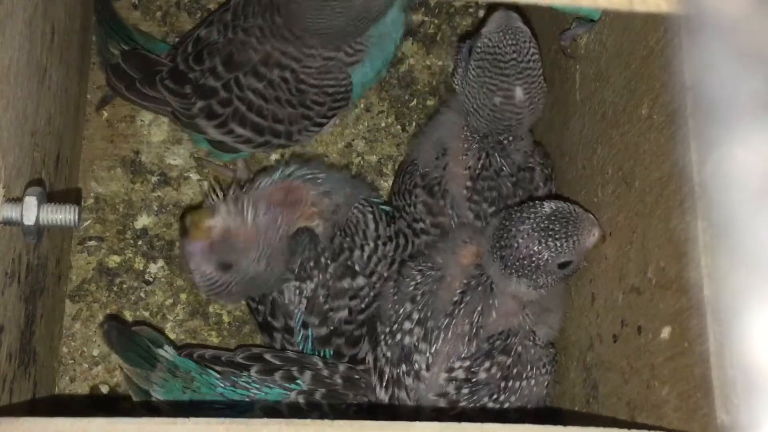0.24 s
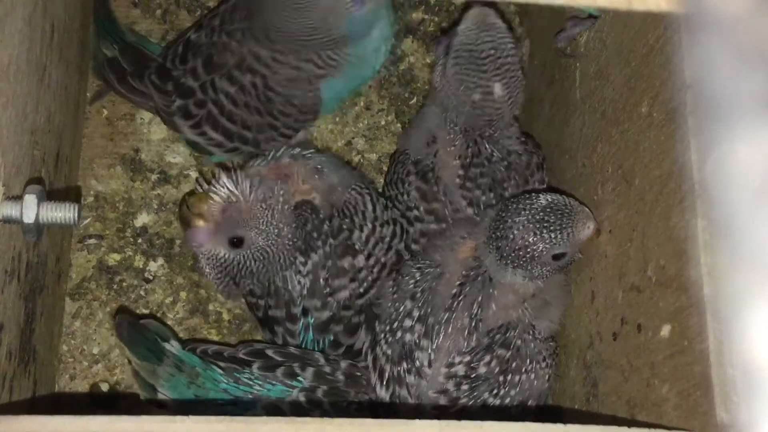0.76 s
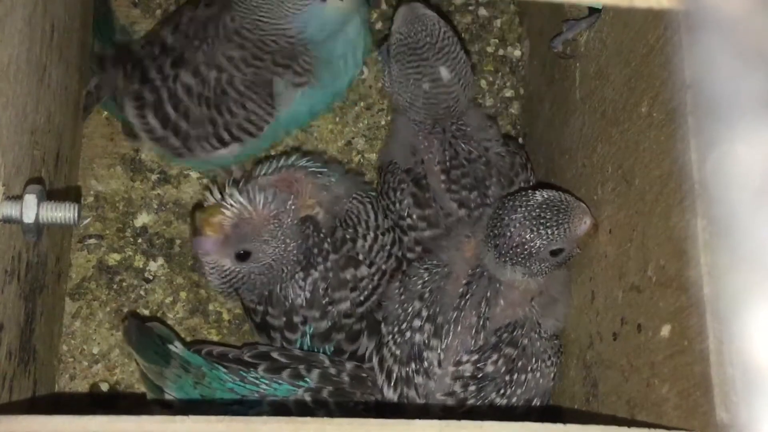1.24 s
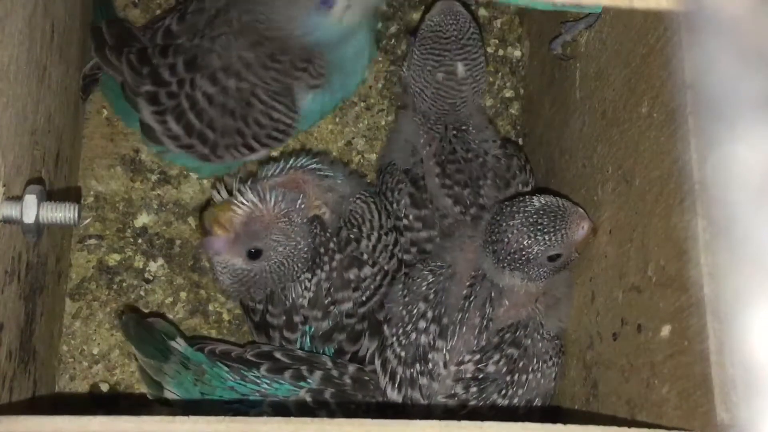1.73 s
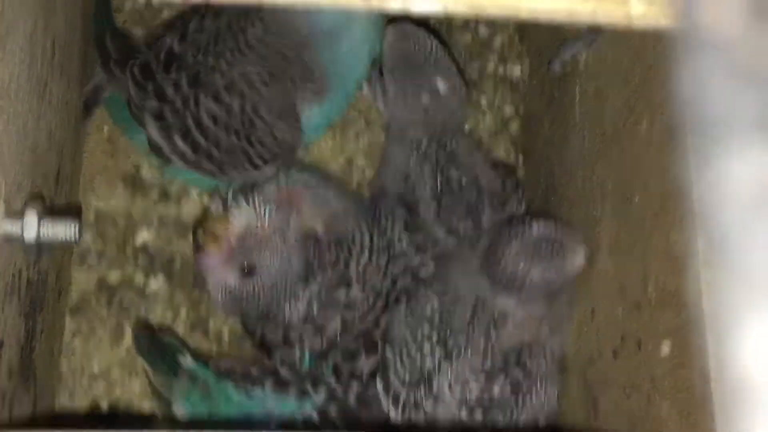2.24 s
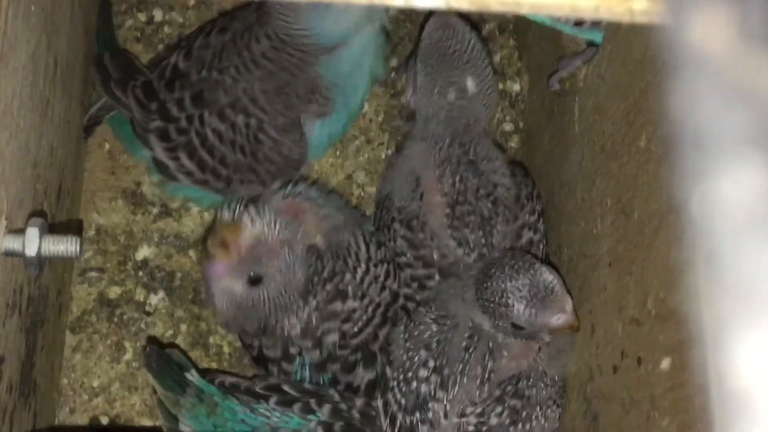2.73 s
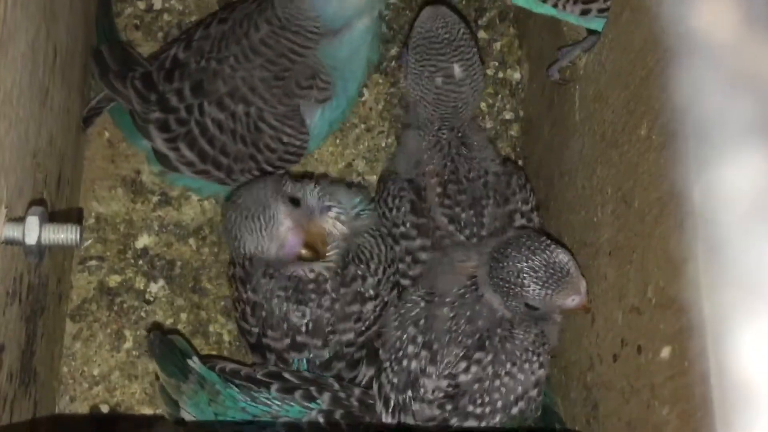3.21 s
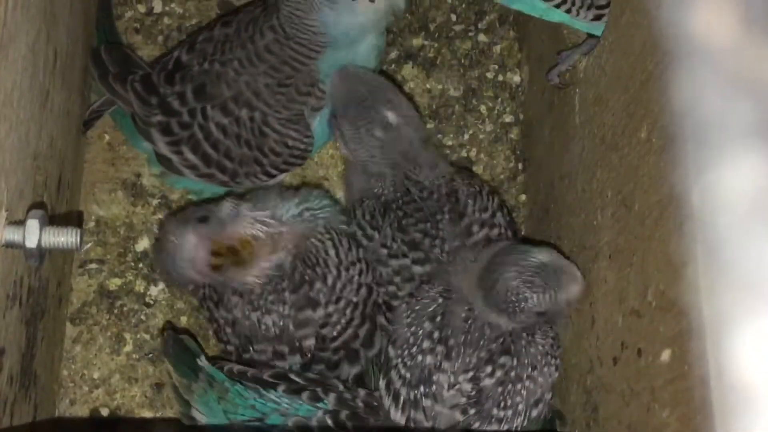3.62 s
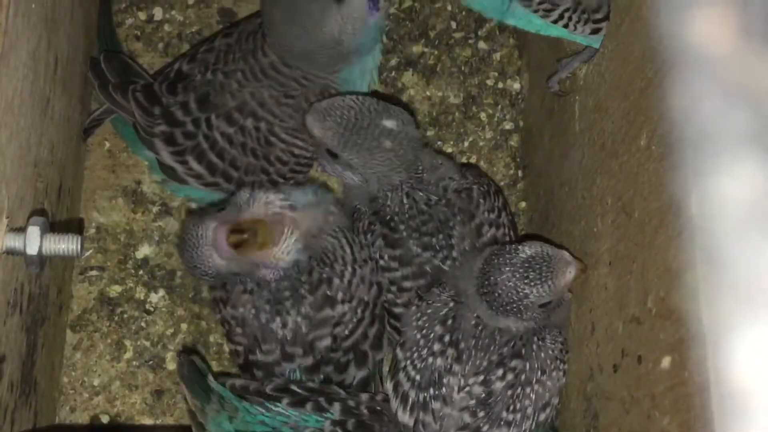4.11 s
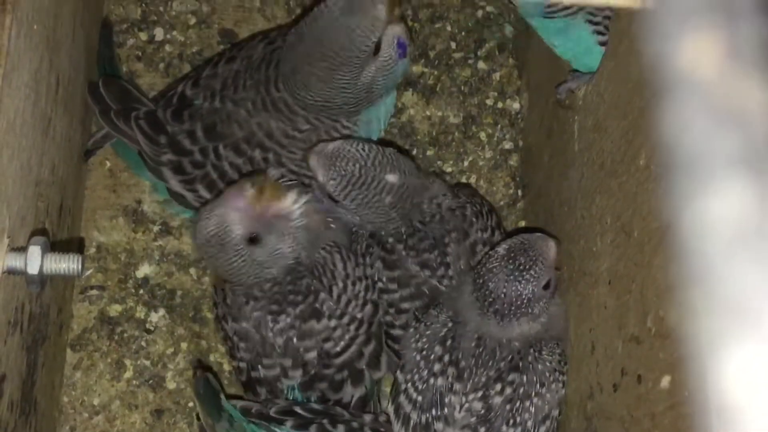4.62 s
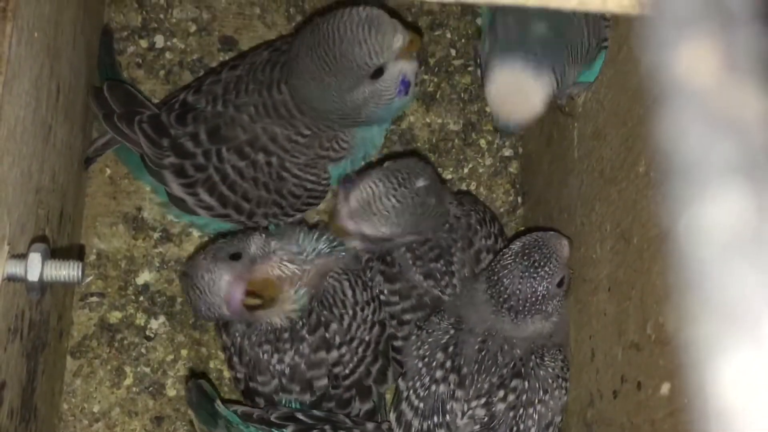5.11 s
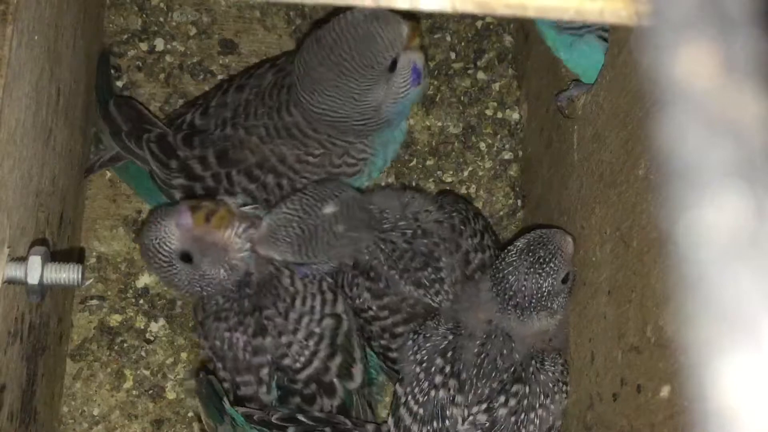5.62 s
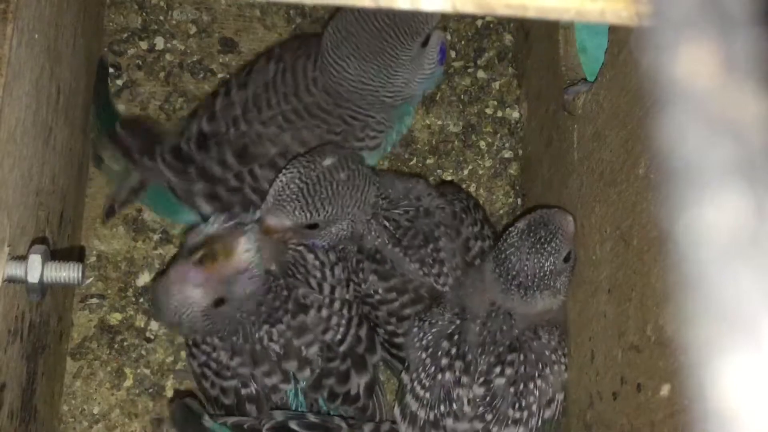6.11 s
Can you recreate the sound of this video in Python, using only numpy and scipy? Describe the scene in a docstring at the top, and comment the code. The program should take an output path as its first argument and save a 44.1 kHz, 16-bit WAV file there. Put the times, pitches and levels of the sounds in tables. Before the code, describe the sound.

A whistle tail and falling notes open into a run of shrill, rasping chick calls, fluttering very fast. Later calls burst in more sharply at the top and slide down, with brief pauses and quiet ticks on wood, one knock clearer midway. A second chick whistles higher over them. Close microphone, small hard-walled nest box, little room tail, faint electrical hum and soft shuffling.

```python
"""A soft whistle tail and falling notes over faint hum, then rasping calls of budgerigar chicks begging.
Each call starts high and sags, fluttering fast, and breaks into loud low scoops with soft upward flips.
Falling notes and soft whistles link the calls; a smoother second voice joins in. Feet shuffle, claws tap wood.
Voices are sine overtones on a fluttering pitch plus hiss, coloured by throat and beak; taps are ringing modes
plus noise ticks, shuffles are filtered noise. Box walls and room echo voices and taps."""
import sys
import numpy as np
from scipy import signal
from scipy.fft import rfft, irfft, next_fast_len
from scipy.io import wavfile
from scipy.ndimage import uniform_filter1d, minimum_filter1d

SR = 44100
rng = np.random.default_rng(int(sys.argv[2]) if len(sys.argv) > 2 else 0)


def wav_record(signal):
    """Record a signal, one row per channel, as 16-bit PCM in the file named by sys.argv[1]."""
    frames = np.transpose(np.atleast_2d(signal))
    bounded = np.clip(frames, -1, 1)
    # unit amplitude maps onto the largest positive 16-bit level
    quanta = np.round(bounded * 32767).astype(np.int16)
    wavfile.write(sys.argv[1], SR, quanta)


N = 280035
TIME = np.arange(N) / SR


def undb(db):
    """Decibels to gain."""
    return np.exp(np.asarray(db) * (np.log(10) / 20))


def unit(x):
    """Scale to rms 1."""
    return x / np.sqrt(np.mean(x ** 2))


def colour(x, points):
    """Filter by a spectrum of (f/Hz, level/dB) points, interpolated over log frequency."""
    hz, db = np.transpose(points)
    size = next_fast_len(len(x) + 4096)
    bins_hz = np.arange(size // 2 + 1) * SR / size
    gain = undb(np.interp(np.log(bins_hz + 1), np.log(hz), db))
    return irfft(rfft(x, size) * gain, size)[:len(x)]


def wander(hz):
    """Random motion of rms 1: noise low-passed at hz."""
    lowpass = signal.butter(4, hz, fs=SR, output="sos")
    return unit(signal.sosfilt(lowpass, rng.standard_normal(N)))


def flutter(period_s, scatter, count=1500, order=4):
    """Downward flicks of random length and depth, briefer at a higher order; mean 0, rms 1."""
    length, depth = rng.standard_normal((count, 2)).T
    edges_s = np.cumsum(period_s * np.exp(.25 * length + .2 * depth))
    cycle = np.interp(TIME + edges_s[0], edges_s, np.arange(count))
    flick_depth = np.exp(scatter * np.clip(depth, -2, 1.5))[cycle.astype(int)]
    flicks = -flick_depth * np.abs(np.sin(np.pi * cycle)) ** order
    return unit(flicks - flicks.mean())


def open_share(start, end, fade_s):
    """Linear ramps, 0 to 1 and back, centred on start and end."""
    return np.clip(np.minimum(TIME - start, end - TIME) / fade_s + .5, 0, 1)


def window(start, end, fade_s):
    """Smooth gate, open from start to end."""
    return np.sin(open_share(start, end, fade_s) * np.pi / 2) ** 2


def sounding(table, fade_s):
    """Gate open during each event of a table, and across events that touch."""
    ramps = sum(open_share(row[0], row[1], fade_s) for row in table)
    return np.sin(np.minimum(ramps, 1) * np.pi / 2) ** 2


def held(table, lead_s):
    """Columns of the latest event at every moment, taken up lead_s before it starts."""
    rows = np.array(table, float)
    latest = np.searchsorted(rows[:, 0] - lead_s, TIME) - 1
    return rows.T[:, np.maximum(latest, 0)]


def sag(age_s, half_s):
    """Tension of a call: 1 at its start, half after half_s, then easing to 0."""
    return 1 / (1 + (age_s / half_s) ** 2)


def blend(voice, other, share):
    """Move each control of a voice towards another setting."""
    return [a + share * (b - a) for a, b in zip(voice, other)]


# hum partials: f/Hz, rms level/dB
HUM_PARTIALS = [(120, -67), (180, -66.5), (240, -65.5), (300, -81.5), (420, -78), (483, -78), (760, -73)]
# spectrum of the room noise, scaled as a whole below: f/Hz, relative density/dB
AIR_SPECTRUM = [(30, 9), (80, -10), (130, -4), (260, 6), (450, -2), (700, -1), (950, -3), (1300, -3),
                (1800, 2.5), (2600, -8), (5000, -29), (9000, -18), (15000, -24.5)]


def background(air_db):
    """Steady sine hum over faint coloured room noise."""
    hum = 0
    for hz, db in HUM_PARTIALS:
        hum = hum + np.sqrt(2) * undb(db) * np.sin(2 * np.pi * (hz * TIME + rng.random()))
    return hum + undb(air_db) * unit(colour(rng.standard_normal(N), AIR_SPECTRUM))


WHISTLE_SWELL_DB_PER_S, WHISTLE_UPPER_DB = 32.5, -3.5  # upper overtones relative to the octave
WHISTLE_FLUTTER_HZ, SPUTTER_DB = 70, 4.5
# soft whistles: start t/s, end t/s, f/Hz, fundamental level/dB, octave level/dB (levels at mid-note)
WHISTLE_NOTES = [(-0.01, 0.02, 3280, -33.5, -30), (4.108, 4.22, 3430, -26.5, -46),
                 (4.85, 5.035, 3490, -24, -34), (5.792, 5.848, 3467, -25, -36.5)]


def whistles(fade_s):
    """Notes of level pitch that sputter and swell towards the next call."""
    start, end, hz, low_db, octave_db = held(WHISTLE_NOTES, fade_s)
    swell_db = WHISTLE_SWELL_DB_PER_S * (np.clip(TIME, start, end) - (start + end) / 2)
    swell_db = swell_db + SPUTTER_DB * flutter(period_s=.014, scatter=.4)
    octave_db = octave_db + swell_db
    upper_db = octave_db + WHISTLE_UPPER_DB
    voice = [hz, low_db + swell_db, octave_db, upper_db, np.full(N, WHISTLE_FLUTTER_HZ)]
    return sounding(WHISTLE_NOTES, fade_s), voice


FALL_FADE_DB, FALL_FADE_POWER = -8.5, 5.2  # most of the fade comes at the very end
# falling notes: start t/s, end t/s, top f/Hz, last f/Hz, lateness of the fall (power), fundamental level/dB,
# octave level/dB, upper overtones level/dB, flutter depth/Hz (before bursts)
FALLING_NOTES = [(0.02, 0.097, 3780, 2970, 1.72, -18.5, -15, -22, 115.1),
                 (0.097, 0.178, 3490, 3100, 2.34, -19, -14.5, -23.5, 40),
                 (0.178, 0.214, 2750, 2300, 1.2, -33.5, -24, -23.5, 141.4),
                 (0.885, 0.948, 3423, 3140, 1.5, -18, -18.5, -24, 89.64),
                 (2.095, 2.245, 3506, 3380, 4, -24, -14.5, -22, 60),
                 (2.245, 2.312, 3188, 2780, 3, -23.5, -12, -16.5, 107),
                 (2.312, 2.339, 2256, 1990, 0.997, -32, -22, -26, 258.6),
                 (3.012, 3.143, 3453, 3240, 3, -24.5, -16.5, -17.5, 97.5),
                 (3.143, 3.166, 2900, 2450, 1.1, -30.5, -24, -21.5, 181.3),
                 (3.93, 4.02, 3600, 2860, 2.5, -19.5, -19.5, -21, 173),
                 (4.002, 4.074, 2878, 2532, 0.66, -28.5, -12.5, -20, 113.8),
                 (4.755, 4.85, 2850, 2404, 3, -28, -15.5, -26.5, 138),
                 (5.68, 5.754, 3080, 2400, 4.6, -24.5, -15, -22.5, 151)]


def falls(fade_s):
    """Pitch drops along a power curve, mostly late in the note, and the level dies away."""
    start, end, top_hz, last_hz, power, low_db, octave_db, upper_db, flutter_hz = held(FALLING_NOTES, fade_s / 2)
    along = np.clip((TIME - start) / (end - start), 0, 1)
    fade_db = FALL_FADE_DB * along ** FALL_FADE_POWER
    hz = top_hz + (last_hz - top_hz) * along ** power
    voice = [hz, low_db + fade_db, octave_db + fade_db, upper_db + fade_db, flutter_hz]
    return sounding(FALLING_NOTES, fade_s), voice


SCOOP_RIM_HZ, SCOOP_SKEW = 377.7, 1.35  # edges above the bottom; skew over 1 puts the bottom late
SCOOP_LOW_DB, SCOOP_UPPER_DB = -23.5, -5.5  # fundamental; upper overtones relative to the octave
FLIP_S, FLIP_LOW_DB, FLIP_OCTAVE_DB, FLIP_UPPER_DB = 0.019, -23.5, -18.5, -21.5
YODEL_FLUTTER_HZ = 80.8  # before bursts
# yodel scoops: start t/s, end t/s, lowest f/Hz, octave level/dB, f/Hz of the flip that follows
YODEL_SCOOPS = [(0.08, 0.096, 2825, -14.5, 3520), (0.376, 0.396, 2950, -8.5, 3100),
                (0.438, 0.468, 2850, -13, 2900), (0.47, 0.52, 2532, -8.5, 3100),
                (0.543, 0.57, 2520, -9, 2850), (0.594, 0.651, 2435, -13, 3800),
                (0.673, 0.70, 2460, -7, 3400), (0.726, 0.782, 2406, -14, 3300),
                (0.809, 0.833, 2460, -18.5, 3300), (0.857, 0.882, 2550, -17.5, 3464),
                (0.948, 0.964, 2580, -14.5, 3498), (1.337, 1.395, 2695, -11, 3986),
                (1.419, 1.443, 2570, -11, 3600), (1.461, 1.527, 2535, -12, 3950),
                (1.549, 1.577, 2520, -18, 3850), (1.6, 1.662, 2515, -18.5, 4018),
                (2.132, 2.162, 2900, -13, 3430), (3.75, 3.793, 2890, -9.5, 3040),
                (3.795, 3.815, 2559, -11.5, 2830), (4.41, 4.458, 2597, -13, 3220),
                (4.525, 4.585, 2505, -9.5, 3300), (4.607, 4.634, 2560, -12.5, 3200),
                (4.66, 4.68, 2522, -15, 3231), (4.69, 4.714, 2510, -14, 3600),
                (4.735, 4.755, 2435, -14.5, 2698), (5.35, 5.371, 2520, -8.5, 3200),
                (5.393, 5.414, 2658, -9.5, 2984), (5.449, 5.469, 2396, -20, 2939),
                (5.476, 5.496, 2540, -8.5, 3310), (5.521, 5.543, 2500, -11.5, 3648),
                (5.577, 5.629, 2430, -10.5, 3566), (5.654, 5.678, 2500, -13.5, 3173),
                (6.085, 6.13, 2597, -15, 3080), (6.24, 6.305, 2430, -17.5, 3855)]


def yodel(voice, break_s):
    """The register breaks into a low scoop with a loud octave, then flips up into a soft high one."""
    start, end, bottom_hz, octave_db, flip_hz = held(YODEL_SCOOPS, break_s / 2)
    along = np.clip((TIME - start) / (end - start), 0, 1)
    scoop_hz = bottom_hz + SCOOP_RIM_HZ * (2 * along ** SCOOP_SKEW - 1) ** 2
    flip = [flip_hz, FLIP_LOW_DB, FLIP_OCTAVE_DB, FLIP_UPPER_DB, YODEL_FLUTTER_HZ]
    scoop = [scoop_hz, SCOOP_LOW_DB, octave_db, octave_db + SCOOP_UPPER_DB, YODEL_FLUTTER_HZ]
    voice = blend(voice, flip, window(end - break_s, end + FLIP_S, break_s))
    return blend(voice, scoop, window(start, end, break_s))


ATTACK_S, ATTACK_DB = 0.0062, -11  # a beg swells up from this much softer
FLUTTER_FADE_S = 1.7  # 1/e time
# begging calls: start t/s, end t/s, first f/Hz, settled f/Hz, half-sag t/s, first fundamental level/dB,
# settled fundamental level/dB, octave level/dB, upper overtones level/dB, first flutter depth/Hz (before bursts)
BEG_CALLS = [(0.228, 0.885, 3682, 2516, 0.16, -16, -27, -16, -20, 197.4),
             (0.941, 1.688, 3570, 2770, .18, -15.5, -25.5, -21.5, -21, 203.6),
             (1.688, 2.095, 3700, 2744, .14, -13, -24.5, -16, -20.5, 197.3),
             (2.647, 3.012, 3660, 2677, 0.089, -13, -24, -17.5, -18.5, 242.3),
             (3.533, 3.93, 3880, 2800, .05, -6, -26, -18.5, -16.5, 185.3),
             (4.218, 4.755, 3610, 2856, .08, -9.5, -20.5, -16, -15.5, 158.6),
             (5.033, 5.68, 3573, 2751, .085, -10, -24.5, -16, -14, 164.6),
             (5.842, 6.37, 3583, 2910, .07, -12.5, -20, -15, -15.5, 157.4)]


def begs(fade_s):
    """After a quick swell, pitch and fundamental sag together as the tension eases; the flutter calms."""
    (start, end, first_hz, settled_hz, half_s, first_db, settled_db,
     octave_db, upper_db, flutter_hz) = held(BEG_CALLS, fade_s / 2)
    age_s = np.maximum(TIME - start, 0)
    hz, low_db = blend([settled_hz, settled_db], [first_hz, first_db], sag(age_s, half_s))
    swell_db = ATTACK_DB * np.exp(-(age_s / ATTACK_S) ** 2)
    flutter_hz = flutter_hz * np.exp(-age_s / FLUTTER_FADE_S)
    voice = [hz, low_db + swell_db, octave_db + swell_db, upper_db + swell_db, flutter_hz]
    return sounding(BEG_CALLS, fade_s), voice


SIDE_TONE_HZ, SIDE_TONE_DEPTH, SIDE_TONE_DRIFT = 428, 0.26, 0.2  # means; drift as rms share of the rate


def side_tones():
    """A slower throat vibration comes and goes, putting rough side tones around every overtone."""
    hz = SIDE_TONE_HZ * (1 + SIDE_TONE_DRIFT * wander(30))
    depth = SIDE_TONE_DEPTH * (1 + np.tanh(wander(14.3)))
    return 1 + depth * np.sin(2 * np.pi * np.cumsum(hz) / SR)


def syrinx(hz, harmonic_db, rasp, shimmer_db, hiss_db):
    """A membrane vibrates with overtones in uneven cycles; air hisses past it in bursts."""
    phase = 2 * np.pi * np.cumsum(hz * (1 + rasp * wander(650))) / SR
    throb = wander(220)
    tone = 0
    for k, db in enumerate(harmonic_db, 1):
        in_range = np.clip((SR / 2 - k * hz) / 2000, 0, 1)  # fades out towards Nyquist
        gain = np.sqrt(2) * in_range * undb(db + shimmer_db * (throb + wander(140)))
        tone = tone + gain * np.sin(k * phase)
    hiss = colour(rng.standard_normal(N), [(2000, -14), (4400, -21), (6500, -14), (9500, -1), (16000, 0)])
    return tone + undb(harmonic_db[2] + hiss_db + 3.1 * throb) * hiss


WAVER_HZ, WAVER_RATE_HZ = 61.8, 22  # slow unsteadiness of the pitch, rms
BURST_DB, BURST_RATE_HZ = 5.5, 24  # flutter comes and goes, within +-BURST_DB
BREAK_HZ, BREAK_PERIOD_S, BREAK_DB = 98.3, .04, 1  # pitch cracks downward, octave rises; scaled by strain
BRIGHTNESS_DB, BRIGHTNESS_RATE_HZ = 2, 18  # beak opens and closes on the upper overtones
BUZZ_DB, BUZZ_RATE_HZ = 1.5, 170  # quick rough spurts of the upper overtones
PULSE_DB = -1.5  # each downward flick of the pitch lifts the overtones
HISS_STRAIN_DB = 8.5  # more flutter, more hiss
OVERTONE_DRIFT_DB, OVERTONE_DRIFT_RATE_HZ = 2.5, 16  # per overtone


def lead_voice(rasp_floor, rasp_per_hz):
    """One harsh voice runs through begs, falls and whistles, its pitch fluttering some 130 times a second."""
    notes = [begs(fade_s=.012), falls(fade_s=.012), whistles(fade_s=0.014)]
    gate = sum(g for g, _ in notes)
    controls = sum((g + 1e-9) * np.array(voice) for g, voice in notes) / (gate + 3e-9)
    controls = uniform_filter1d(controls, size=130)
    hz, low_db, octave_db, upper_db, flutter_hz = yodel(controls, break_s=.007)

    strain = flutter_hz / np.mean(flutter_hz)
    crack = strain * flutter(BREAK_PERIOD_S, scatter=.4, order=24)
    flutter_hz = flutter_hz * undb(BURST_DB * np.tanh(wander(BURST_RATE_HZ)))
    flick = flutter(period_s=.0075, scatter=.5, order=5)
    swing_hz = flutter_hz * flick + BREAK_HZ * crack
    hz = hz + WAVER_HZ * wander(WAVER_RATE_HZ)
    # dips ease off towards the membrane's lowest pitch
    room_hz = np.maximum(hz - 2250, 90)
    swing_hz = np.where(swing_hz < 0, room_hz * np.tanh(swing_hz / room_hz), swing_hz)

    # fundamental swells at the top of each swing, overtones at the bottom
    low_db = low_db + 3 * np.tanh(swing_hz / 300)
    pulse_db = PULSE_DB * np.tanh(flick)
    octave_db = octave_db - BREAK_DB * np.tanh(crack) + 0.21 * pulse_db
    upper_db = upper_db + pulse_db
    upper_db = upper_db + BRIGHTNESS_DB * wander(BRIGHTNESS_RATE_HZ)
    upper_db = upper_db + BUZZ_DB * wander(BUZZ_RATE_HZ)
    hiss_db = -8 + HISS_STRAIN_DB * np.tanh(strain - 1)
    rasp = rasp_floor + rasp_per_hz * flutter_hz  # harder flutter, more uneven cycles
    levels_db = [low_db, octave_db]
    for db in (-1.5, -0.99, -.8, -.8):
        levels_db.append(upper_db + db + OVERTONE_DRIFT_DB * wander(OVERTONE_DRIFT_RATE_HZ))
    voice = syrinx(hz + swing_hz, levels_db, rasp, shimmer_db=2.0, hiss_db=hiss_db)
    return np.minimum(gate, 1) * side_tones() * voice


SECOND_SAG_S = 0.086  # time to sag halfway
# second voice: start t/s, end t/s, first f/Hz, settled f/Hz, fundamental level/dB, overtones level/dB
SECOND_NOTES = [(0.42, 0.72, 4122, 3815, -27, -24), (0.72, 0.885, 3783, 3346, -24, -23),
                (0.96, 1.14, 3818, 3437, -20.5, -18.5), (1.303, 1.338, 3950, 3928, -19, -14.5),
                (1.47, 1.525, 3950, 3690, -33, -24), (1.88, 2.09, 4213, 3503, -23.5, -21),
                (2.73, 2.86, 4050, 3650, -23.5, -20.5), (2.88, 3.012, 3930, 3445, -20, -18.5),
                (3.61, 3.94, 3840, 3700, -19, -21.5), (4.37, 4.75, 4295, 3567, -18.5, -19.5),
                (5.285, 5.68, 3995, 3540, -22.5, -16), (6.04, 6.37, 4166, 3536, -18.5, -24.5)]


def second_voice():
    """A smoother, higher whistle whose pitch sags in the same way, with two speeds of flutter."""
    start, end, first_hz, settled_hz, low_db, overtone_db = held(SECOND_NOTES, .01)
    hz = settled_hz + (first_hz - settled_hz) * sag(TIME - start, SECOND_SAG_S)
    hz = hz + 120 * flutter(period_s=.03, scatter=.4)
    hz = hz + 70 * flutter(period_s=.008, scatter=.5)
    levels_db = [low_db, overtone_db] + [overtone_db - 2.0] * 3
    voice = syrinx(hz, levels_db, rasp=.009, shimmer_db=2.0, hiss_db=-2.0)
    return window(start, end, fade_s=.01) * voice


# throat and open beak response: f/Hz, level/dB
THROAT_RESPONSE = [(1200, -64.5), (1900, -28), (2450, -1.5), (3200, -5.5), (3800, -5.5), (4450, -7.5),
                   (4750, -8), (5050, -1.5), (5500, -3.5), (6100, -3), (6700, -7.5), (7600, -10.5),
                   (10300, -20.5), (12600, -16), (15500, -21)]


def throat(x):
    """Throat and beak resonances colour the overtones."""
    return colour(x, THROAT_RESPONSE)


# soft shuffles: centre t/s, length t/s (1/e width), centre f/Hz, rms level/dB at the centre
FLOOR_SHUFFLES = [(0.893, .14, 730, -58), (1.185, 0.022, 230, -51.5), (2.206, 0.16, 417, -60.5),
                  (2.77, .05, 380, -54.5), (2.835, 0.1, 748, -60.5), (3.797, 0.039, 432, -52),
                  (4.015, 0.33, 408, -58), (4.907, 0.21, 478, -62.5), (5.316, 0.49, 489.4, -59),
                  (5.97, 0.39, 472, -59)]


def shuffling(flank_db):
    """Feet and feathers brush the box floor: band-shaped noise in soft, hollow swells."""
    out = 0
    for s, length_s, hz, db in FLOOR_SHUFFLES:
        band = [(hz / 2, -flank_db), (hz, 0), (hz * 2, -flank_db), (hz * 10, -60)]
        brush = unit(colour(rng.standard_normal(N), band))
        out = out + brush * undb(db) * np.exp(-(2 * (TIME - s) / length_s) ** 2)
    return out


# claws and beaks on wood: t/s, knock relative level/dB, tick relative level/dB
WOOD_TAPS = [(1.082, -43, -35), (2.316, -34, -29), (2.428, -65, -37), (2.572, -51, -32),
             (2.621, -48.5, -32), (3.318, -75, -42), (3.41, -73, -56), (3.454, -22.5, -24),
             (5.41, -30.5, -33.5), (5.89, -36, -42)]
# ringing modes of the tapped box: f/Hz, relative level/dB, t60/s
BOX_MODES = [(1220, -7.5, 0.055), (1275, 0.5, 0.064), (1477, -10, 0.03), (1814, -5.5, 0.049),
             (2320, -22.5, .04), (3290, 1, 0.019), (5030, 8.5, 0.0074), (5300, -12, 0.042)]


def taps(tick_t60_s):
    """Each tap is a short scratchy noise tick and a ring of the thin wood."""
    t = TIME[:SR // 4]
    ring = sum(undb(db - 60 * t / t60_s) * np.sin(2 * np.pi * hz * t) for hz, db, t60_s in BOX_MODES) / 2
    out = np.zeros(N + len(t))
    for s, knock_db, tick_db in WOOD_TAPS:
        tick = np.diff(rng.standard_normal(len(t) + 1)) * undb(-60 * t / tick_t60_s) / 4
        start = int(s * SR)
        out[start:start + len(t)] += undb(knock_db) * ring + undb(tick_db) * tick
    # thin boards radiate little bass
    return colour(out[:N], [(100, -27.5), (700, -23.5), (1150, -1.5)])


# first echoes from the box walls: delay t/ms, level/dB
WALL_ECHOES = [(.83, -19), (1.37, -34.5), (2.3, -28), (3.4, -13.5), (5.1, -27), (7.3, -21)]


def nest_box(x):
    """Close walls comb the sound, so that glides also throb."""
    return x + sum(undb(db) * np.interp(TIME - ms / 1000, TIME, x, left=0) for ms, db in WALL_ECHOES)


def room(x, t60_s, wet_db):
    """Decaying noise response: a faint, duller tail from the room outside the box."""
    t = TIME[:SR]
    tail = colour(rng.standard_normal(SR), [(1000, 5), (6500, -4.5), (8500, -14.0), (15000, -13)])
    tail = tail * undb(-60 * t / t60_s) * np.minimum(t / 0.016, 1)
    return x + undb(wet_db) * signal.fftconvolve(x, tail / np.linalg.norm(tail))[:N]


def scene():
    """Voices and taps echo in box and room; shuffles and background are added dry."""
    chicks = throat(lead_voice(rasp_floor=0.0043, rasp_per_hz=.00008) + second_voice())
    knocks = taps(tick_t60_s=0.045)
    heard = room(nest_box(chicks + knocks), t60_s=.38, wet_db=-26)
    return (heard + shuffling(flank_db=28.5) + background(air_db=-58.5))[None]


TOP_HZ = 15850


def record(dry):
    """Cuts rumble, ducks peaks over 0.88 and cuts the top."""
    x = signal.sosfilt(signal.butter(4, 85, "high", fs=SR, output="sos"), dry)
    headroom = .88 / np.maximum(np.abs(x), .88)
    x = x * uniform_filter1d(minimum_filter1d(headroom, size=300), size=300)
    return signal.sosfiltfilt(signal.ellip(10, .05, 50, TOP_HZ, fs=SR, output="sos"), x)


dry = scene()
out = record(dry)
wav_record(out)
```